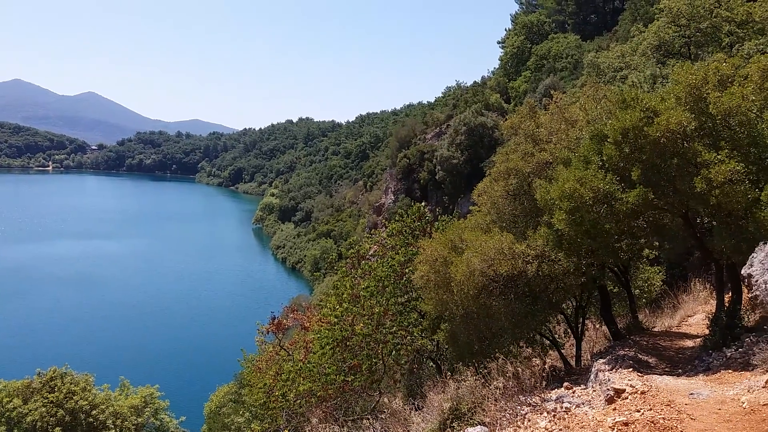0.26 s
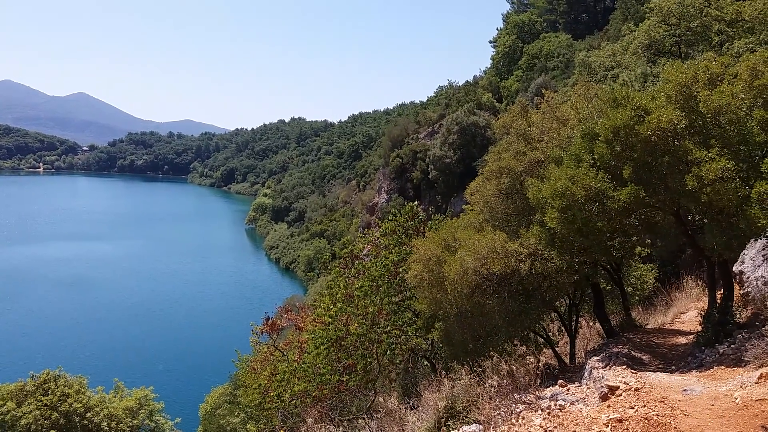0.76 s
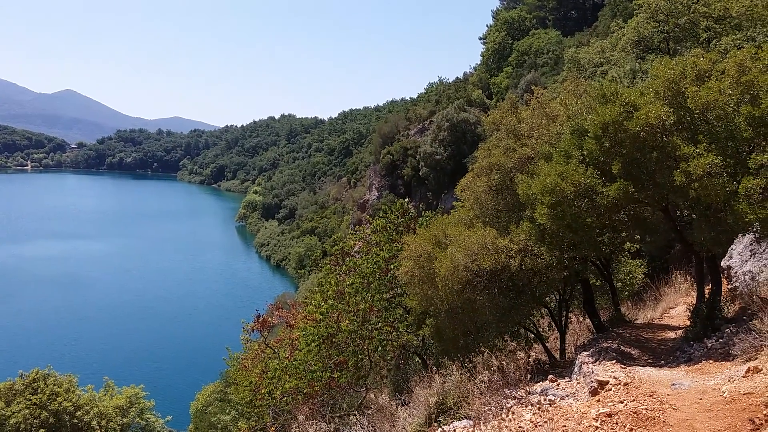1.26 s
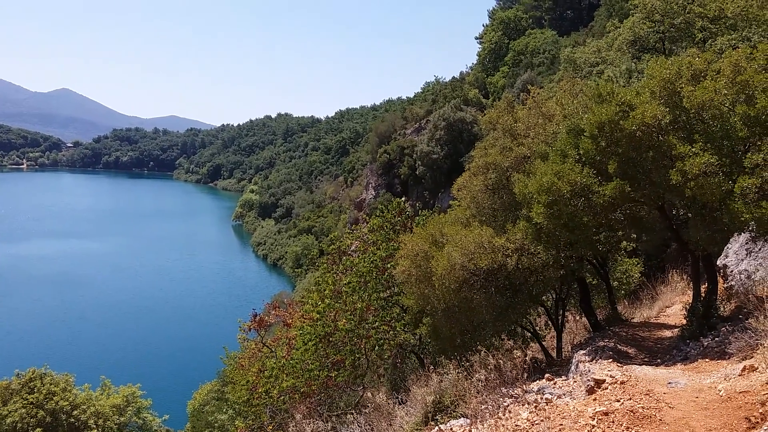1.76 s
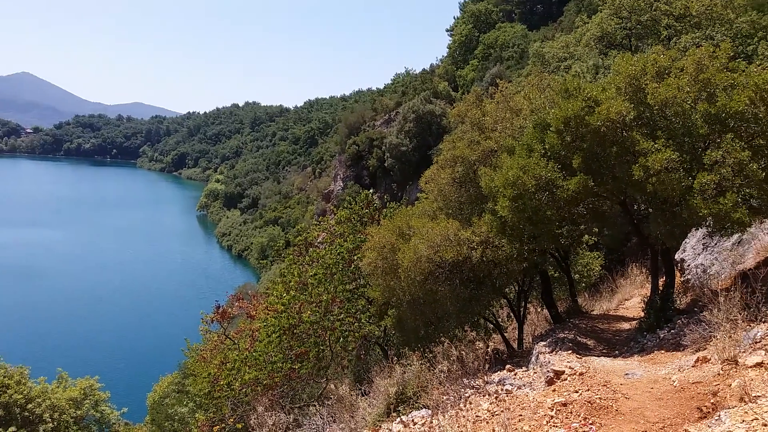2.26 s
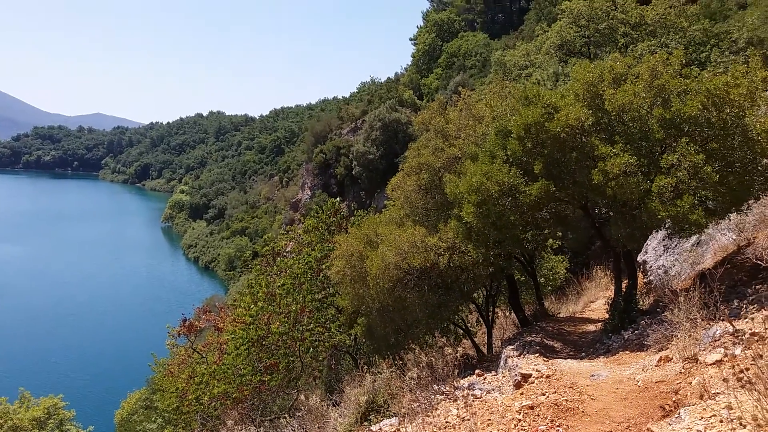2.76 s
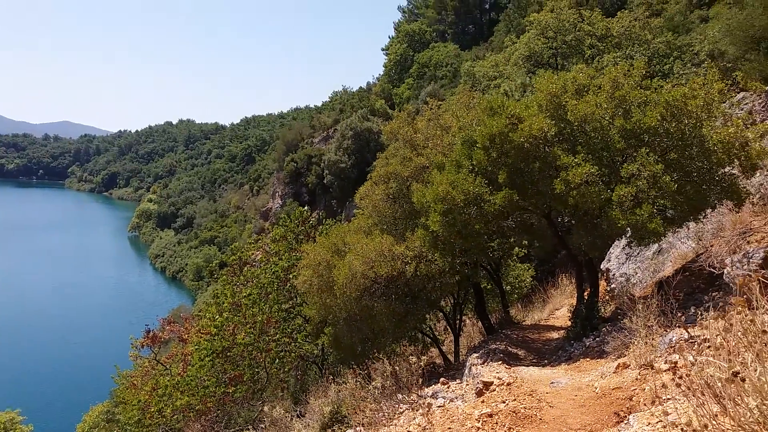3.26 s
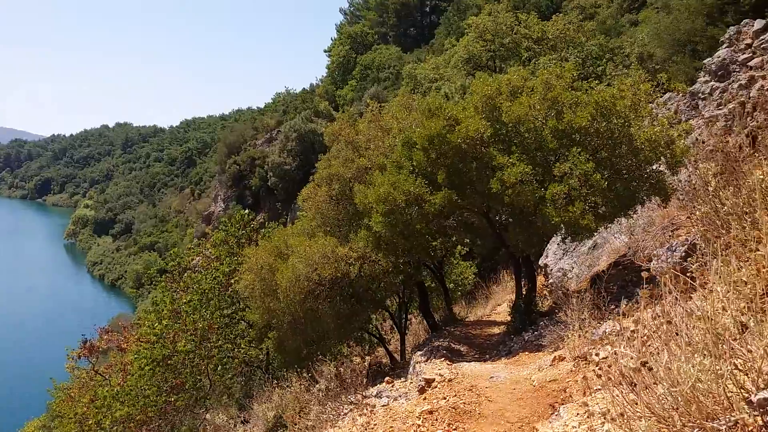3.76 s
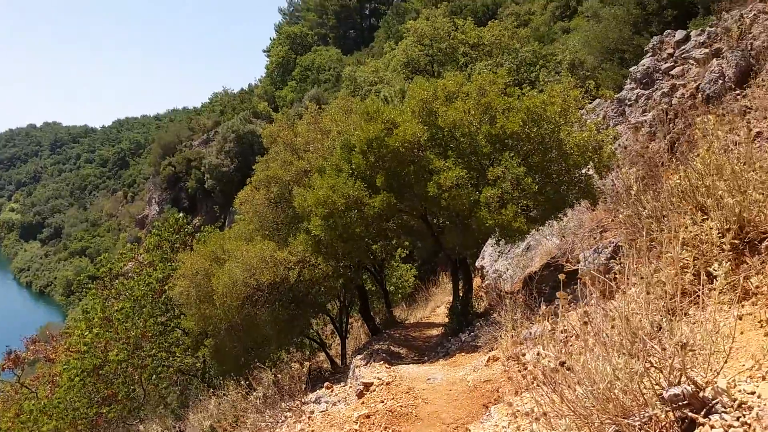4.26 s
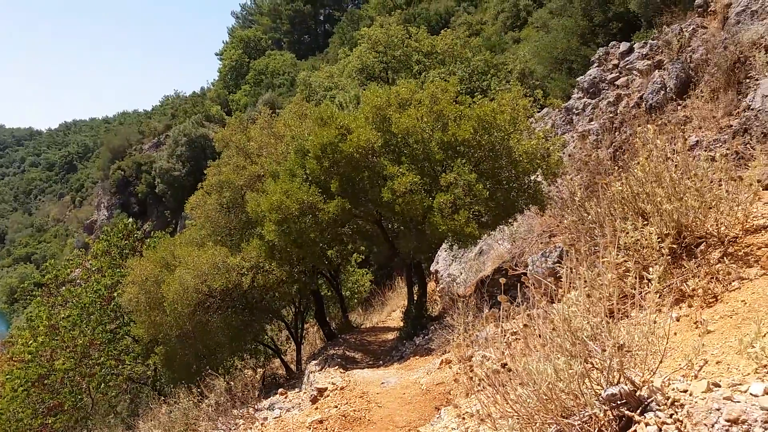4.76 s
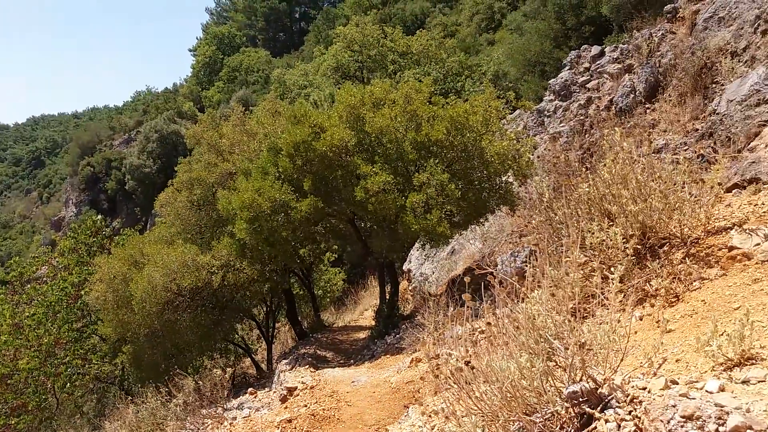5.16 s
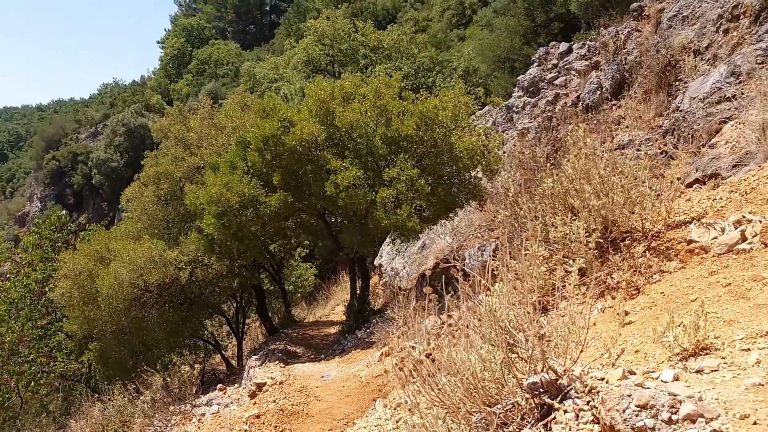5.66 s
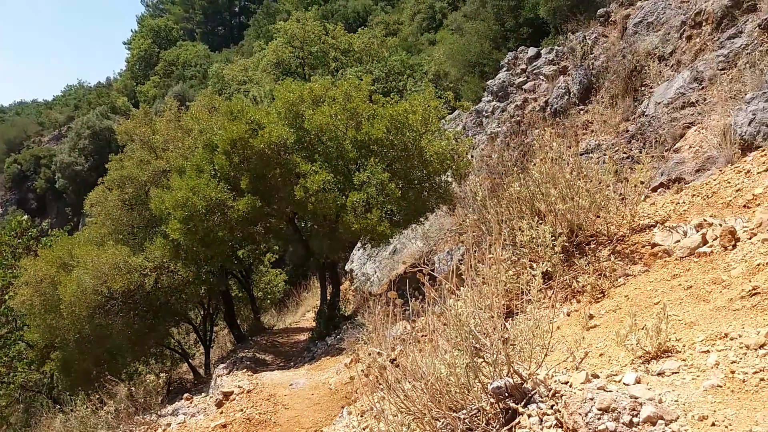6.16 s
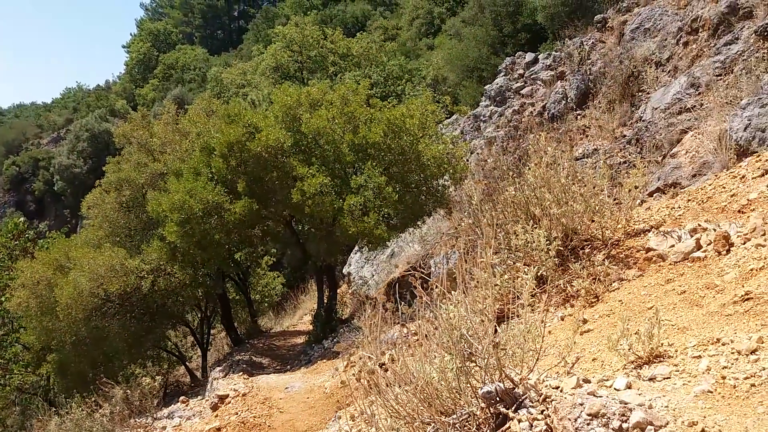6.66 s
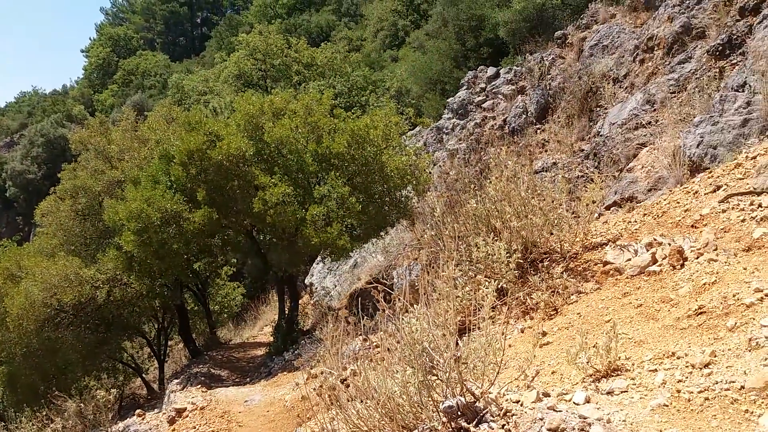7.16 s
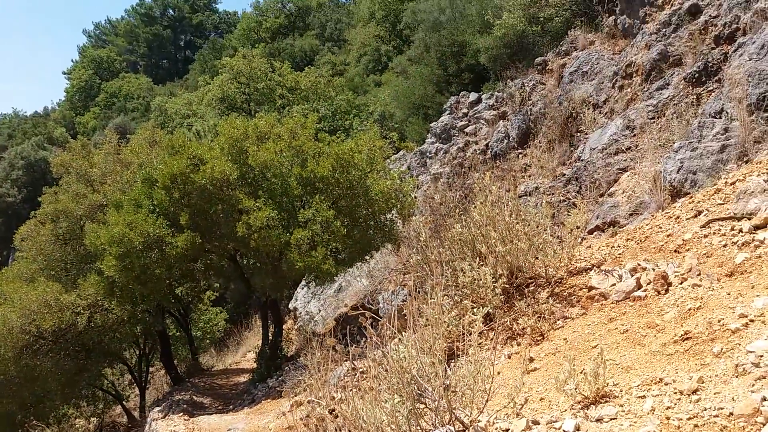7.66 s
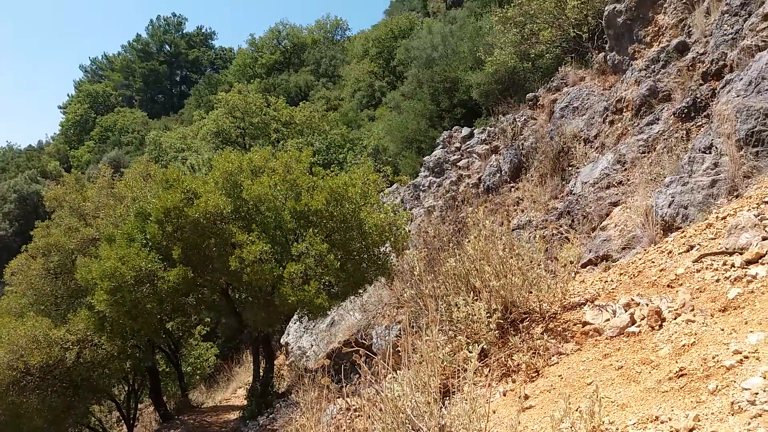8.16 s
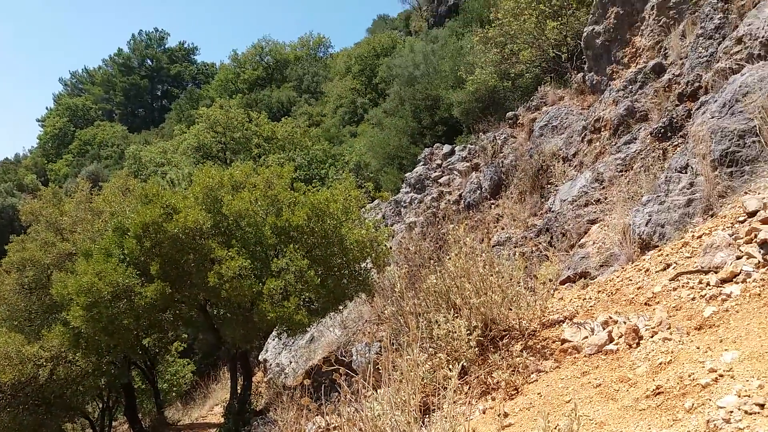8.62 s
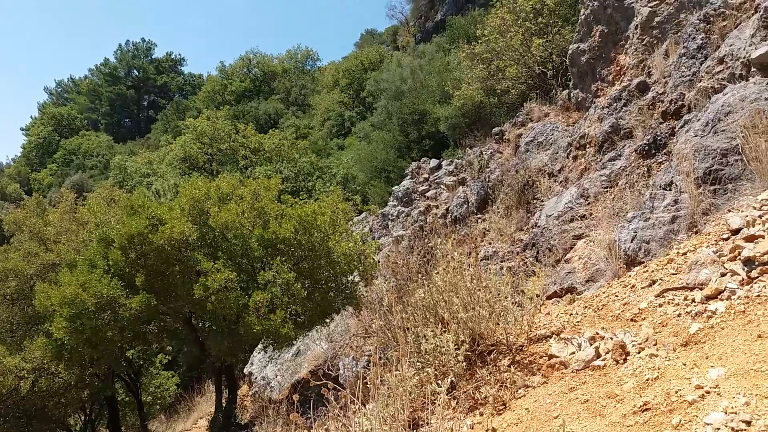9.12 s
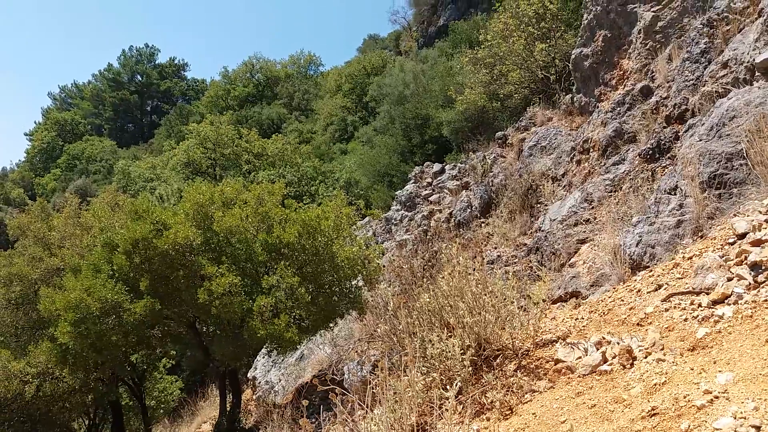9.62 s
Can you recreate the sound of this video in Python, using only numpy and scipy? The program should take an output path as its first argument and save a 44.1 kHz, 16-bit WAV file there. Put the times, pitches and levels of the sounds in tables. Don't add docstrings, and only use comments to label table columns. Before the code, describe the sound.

Cicadas rasp in a steady, high, throbbing chorus outdoors while fingers tick, rub and knock on the hand-held camera in a faint breeze.

```python
import sys
import numpy as np
from scipy import signal
from scipy.fft import rfft, irfft, next_fast_len
from scipy.io import wavfile
from scipy.ndimage import uniform_filter1d

SR = 44100
rng = np.random.default_rng(int(sys.argv[2]) if len(sys.argv) > 2 else 0)


def inscribe(sig):
    pcm = np.round(np.clip(np.atleast_2d(sig).T, -1, 1) * 32767)
    wavfile.write(sys.argv[1], SR, pcm.astype(np.int16))


def nominal_scale(level):
    x = np.asarray(level, float) / 20
    return 10 ** x


N = 436149
TIME_S, FFT_SIZE = np.arange(N) / SR, next_fast_len(N)
BIN_HZ = np.fft.rfftfreq(FFT_SIZE, 1 / SR)


def unit(x):
    return x / np.sqrt(np.mean(x ** 2))


def ring(x, hz, width_hz):
    return signal.lfilter(*signal.iirpeak(hz, hz / width_hz, fs=SR), x)


def butter(x, hz, kind, order=2):
    return signal.sosfilt(signal.butter(order, hz, kind, fs=SR, output="sos"), x)


def walk(rate_hz):
    hold = int(SR / rate_hz)
    steps = np.repeat(rng.standard_normal(N // hold + 1), hold)
    return 1.3 * uniform_filter1d(uniform_filter1d(steps, hold), hold)[:N]


def cicadas():
    # mode_hz, width_hz, level_db
    tymbal_modes = [(4107, 280, -18.5), (4370, 240, -8), (4558, 200, -2.5), (4757, 170, 1),
                    (4943, 220, -7.5), (5186, 220, -5.5), (5440, 220, -11)]
    # mode_hz, width_hz, level_db
    flank_modes = [(5605, 240, 0), (5810, 300, 0.5), (6020, 330, -4.5), (6450, 400, -11.5),
                   (6850, 310, -10.5), (7580, 350, -12.5), (8900, 1700, -18)]
    # time_s, slow_tree_cycles, middle_tree_cycles, quick_tree_cycles
    throb_counts = np.transpose([(0.0, 0.14, -0.03, -0.41), (0.707, 4.7, 5.38, 5.9),
                                 (1.414, 9.69, 10.83, 11.95), (2.121, 14.59, 16.02, 17.8),
                                 (2.829, 19.2, 21.28, 23.57), (3.536, 23.77, 26.52, 29.35),
                                 (4.243, 28.65, 31.93, 34.92), (4.95, 33.29, 37.48, 40.4),
                                 (5.657, 38.09, 42.81, 46.08), (6.364, 42.73, 48.1, 52.02),
                                 (7.071, 47.34, 53.37, 58.04), (7.779, 52.02, 58.77, 64.07),
                                 (8.486, 56.95, 64.2, 70.0), (9.193, 61.93, 69.58, 75.61),
                                 (9.9, 66.75, 75.02, 81.7)])
    # time_s, slow_tree_crest_db, middle_tree_crest_db, quick_tree_crest_db
    tree_crests = np.transpose([(0.0, -53, -53, -59), (0.99, -54, -53.5, -65), (1.98, -56, -54.5, -52),
                                (2.97, -54.5, -56, -51.5), (3.96, -58, -53.5, -64), (4.95, -55, -55, -57),
                                (5.94, -50, -57, -62.5), (6.929, -53, -54, -58.4), (7.92, -59.5, -51, -67),
                                (8.91, -59.5, -62.5, -49), (9.9, -43, -53, -54.5)])
    singers_per_tree = 3
    flank_db, flank_fade_db_s, flank_per_db = (-8, -12.5, -10), -0.5, 0.7
    half_depth_db, squareness, rest_bias = (13.5, 6.5, 9.5), 0.75, -0.19

    chorus = 0
    haze_s = np.arange(6000) / SR
    for tree in range(3):
        cycle = np.cos(2 * np.pi * np.interp(TIME_S, throb_counts[0], throb_counts[tree + 1]))
        throb_db = half_depth_db[tree] * (np.tanh(squareness * (cycle - rest_bias)) - 1)
        bright_db = flank_db[tree] + flank_fade_db_s * TIME_S + flank_per_db * throb_db
        songs = []
        for _ in range(singers_per_tree):
            haze = rng.standard_normal(6000) * np.exp(-haze_s / 0.015) * nominal_scale(-15)
            haze[0] = 1
            songs.append(rfft(singer(), FFT_SIZE) * rfft(haze, FFT_SIZE))
        tint_db = 1.8 * rng.standard_normal((singers_per_tree, len(tymbal_modes)))
        body_spectrum = np.sum(songs * resonances(tymbal_modes, tint_db), axis=0)
        body = unit(irfft(body_spectrum, FFT_SIZE)[:N])
        flank = unit(irfft(sum(songs) * resonances(flank_modes), FFT_SIZE)[:N])
        crest_db = np.interp(TIME_S, tree_crests[0], tree_crests[tree + 1])
        chorus = chorus + nominal_scale(crest_db + throb_db - 0.41) * (body - nominal_scale(bright_db) * flank)
    return chorus


def singer():
    click_hz, jitter, uneven_db, other_side_db = 228, 0.027, 3.5, -3
    pace_hz = click_hz * (1 + 0.03 * rng.standard_normal() + jitter * walk(40))
    beat = np.floor(np.cumsum(pace_hz) / SR + rng.random())
    at = np.flatnonzero(np.diff(beat))
    size = nominal_scale(uneven_db * rng.standard_normal(len(at)) + other_side_db * (beat[at] % 2))
    clicks = np.zeros(N + 200)
    clicks[at] = size
    clicks[at + rng.integers(85, 105, len(at))] = 0.7 * size
    return clicks[:N] * nominal_scale(0.8 * walk(9) + 1.6 * walk(1.5))


def resonances(modes, tint_db=0):
    hz, width_hz, level_db = np.transpose(modes)[:, :, None]
    off = 1j * (BIN_HZ - hz) / width_hz
    swing = (-1) ** np.arange(len(modes))[:, None] * nominal_scale(level_db)
    return nominal_scale(tint_db + np.zeros(len(modes))) @ (swing / (1 + 2 * off) / (1 + off) ** 2)


def knocks():
    # start_s, push_db, rise_ms, hold_ms, fall_ms
    pulling = [(1.2269, -11.6, 0.04, 2.3, 2.36), (1.2284, -20, 0.06, 0.1, 0.5),
               (2.3818, -21.4, 0.15, 0.23, 4.86), (2.427, -9.5, 0.51, 0.0, 2.64),
               (2.4852, -20.8, 0.32, 2.81, 1.65), (5.4953, -28.1, 0.07, 0.01, 0.66),
               (5.5596, 8.9, 0.41, 0.0, 1.49), (5.6914, -3.9, 0.38, 0.0, 3.71),
               (7.4365, 6.6, 0.11, 0.12, 0.8), (7.5968, -14.7, 0.13, 0.0, 5.39),
               (9.6338, -24.3, 0.08, 4.0, 4.61), (9.6396, -12.3, 0.09, 0.78, 2.77),
               (9.8155, -13, 0.4, 0.0, 4.0), (9.8225, -12, 0.3, 0.0, 3.0)]
    # start_s, push_db, rise_ms, hold_ms, fall_ms
    pushing = [
        (1.8869, -27.2, 0.39, 1.57, 3.25),
        (2.3328, -10.6, 0.09, 0.0, 1.03),
        (5.9674, -37.3, 0.29, 2.51, 0.5),
        (7.4729, -15.0, 0.23, 2.59, 4.15),
        (9.5411, -26.1, 0.1, 0.0, 0.18),
    ]

    out = np.zeros(N + 4000)
    ms = np.arange(-250, 3750) * 1000 / SR
    for way, jolts in [(-1, pulling), (1, pushing)]:
        for start_s, push_db, rise_ms, hold_ms, fall_ms in jolts:
            build = (1 + np.tanh(ms / rise_ms / 2)) / 2
            relax = np.exp(-np.logaddexp(0, (ms - hold_ms) / rise_ms) * rise_ms / fall_ms)
            out[round(start_s * SR) - 250:][:4000] += way * nominal_scale(push_db) * build * relax
    return out[:N]


def ticks():
    # start_s, peak_db, ring_hz, thump_re_peak_db
    shell_ticks = [(0.129, -46, 890, 8), (1.144, -48, 1350, 3), (1.179, -41, 2440, -2),
                   (1.351, -52, 1230, -13), (1.804, -49.5, 1260, 4), (1.856, -45, 1140, -3),
                   (1.869, -42.5, 1280, 6), (2.139, -46, 1310, 2), (2.172, -41, 1250, 6),
                   (2.296, -36.5, 1010, 7), (2.405, -36, 1290, -11), (2.825, -44, 966, -5),
                   (2.841, -45.5, 1050, 1), (2.988, -47.5, 1400, -11), (3.042, -48, 1110, -1),
                   (3.579, -48.5, 2180, 8), (3.776, -51.5, 1330, -19), (4.147, -46.5, 930, 5),
                   (4.431, -46, 1460, -6), (4.49, -52, 1330, 3), (6.279, -35.5, 1320, -3.5),
                   (7.833, -36.5, 1390, -1.5), (7.955, -50.5, 1020, 12), (8.132, -42, 1530, -17),
                   (9.092, -38, 1506, -2), (9.227, -50, 1280, 13), (9.552, -57, 937, 2),
                   (9.567, -42.5, 902, 13), (9.579, -51, 902, -15), (9.656, -59, 1060, 0)]
    # start_s, peak_db, ring_hz
    knock_rings = [
        (.188, -48, 3500),
        (1.2268, -29.5, 3470),
        (3.776, -46, 3100),
        (5.5587, -20, 1000),
        (5.5588, -44, 3520),
        (5.691, -29, 1200),
        (7.4306, -42, 900),
        (1.23, -36, 2700),
        (9.541, -42, 3200),
    ]
    # start_s, peak_db, brightest_part_re_peak_db
    snaps = [(1.2262, -43, -41), (1.8687, -32, -14), (2.296, -40, -9), (2.3318, -37, -26), (2.825, -56, -1),
             (2.8405, -49, -1), (5.5586, -24, -18), (5.6875, -50, -30), (7.436, -18, -13.5),
             (9.5793, -32.5, -6), (9.633, -41, -18.5), (9.6403, -31, -21)]

    out = np.zeros(N + 1500)
    t = np.arange(1500) / SR
    for start_s, peak_db, hz, thump_db in [*shell_ticks, *[(*r, -30) for r in knock_rings]]:
        shell = np.sin(2 * np.pi * hz * t) * (hz * t * 7.5) * np.exp(-hz * t * 2.58)
        thump = -nominal_scale(thump_db + 3) * t / 0.0019 * np.exp(1 - t / 0.001)
        out[int(start_s * SR):][:1500] += nominal_scale(peak_db) * (shell + thump)
    for start_s, peak_db, bright_db in snaps:
        noise = rng.standard_normal(1500)
        crack = 0.95 * ring(ring(noise, 4600, 2700), 4600, 2800)
        crack += nominal_scale(bright_db) * ring(ring(noise, 8500, 5000), 9200, 8000)
        burst = t / 0.0005 * np.exp(1 - t / 0.00037)
        out[int((start_s + 0.0002) * SR):][:1500] += nominal_scale(peak_db) * crack * burst
    return out[:N]


def rubs():
    # crest_s, scuff_db, rumble_above_scuff_db,
    # scratch_above_scuff_db, build_up_db_per_s
    drags = [(2.301, -45.5, -1, -11, 2500), (2.316, -41.5, 5.5, -13, 900), (8.3, -71, 15, -9, 298),
             (8.5, -73.5, 16, -16, 300), (9.63, -52, 3, -12, 2000), (9.7, -54, 0, -5, 400),
             (9.725, -52, -8, -3.5, 300), (9.75, -50.5, -14, -6.5, 200), (9.78, -57, -10, 8, 300),
             (9.818, -33, 6, -6, 1100), (9.826, -37.5, 0.5, -12, 1500), (9.85, -49.5, -17, -5, 400),
             (9.87, -50.5, -14, -0.5, 300), (9.889, -48.5, 1, -0.5, 300)]
    # start_s, scuff_db, rumble_above_scuff_db,
    # scratch_above_scuff_db, length_s
    scuffs = [(1.285, -41, 6, -10, 0.014), (1.321, -36, -11, -14.5, 0.025), (1.354, -44, -10, -12, 0.027),
              (1.393, -47.5, 2, -8, 0.029), (1.774, -49.5, -20, -7, 0.021), (1.87, -50, -3, -3, 0.04),
              (1.905, -50.5, -1, -12, 0.047), (1.975, -55.5, -5, -6.5, 0.032), (2.381, -50.5, 9, 4, 0.027),
              (2.45, -32, -12, -24, 0.0084), (2.812, -45, -14, -4.5, 0.015), (3.061, -53, 14, -6, 0.014),
              (4.185, -57.5, 17, -1, 0.01), (5.784, -57, 13, -12, 0.019), (7.47, -37, 8, -8.5, 0.032),
              (7.504, -47.5, 10, -3.5, 0.035), (7.538, -54.5, 15, -2, 0.029), (7.997, -55.5, 17, -8, 0.013),
              (8.967, -57.5, 17, -7.5, 0.017), (9.089, -53.5, 16.5, -10, 0.013),
              (9.157, -54, 17.5, -23.5, 0.012), (9.216, -50.5, -8, -23, 0.029),
              (9.552, -43.5, -1, -10, 0.024), (9.575, -47, 12, -0.5, 0.018),
              (5.512, -46, -12, -6, .01),
        (5.703, -47, -15, -5, .028),
        (7.447, -44, -15, -2, .022),
        (7.588, -40, -6, -12, .005),
    ]
    let_go_db_s = 702

    scuff = butter(ring(slips(1500), 450, 550), 1200, "low")
    rumble = butter(slips(1000), 140, "low", order=4)
    scratch = butter(ring(slips(2500), 1300, 1300), 2700, "low", order=3)
    layers = [unit(scuff), unit(rumble), unit(scratch)]
    gains = np.zeros((3, N))
    for crest_s, scuff_db, rumble_db, scratch_db, build_db_s in drags:
        near = slice(int((crest_s - 0.15) * SR), int((crest_s + 0.1) * SR))
        from_crest_s = TIME_S[near] - crest_s
        shape_db = np.minimum(build_db_s * from_crest_s, -let_go_db_s * from_crest_s)
        gains[:, near] += nominal_scale(scuff_db + shape_db + np.array([[0], [rumble_db + 9.5], [scratch_db]]))
    for start_s, scuff_db, rumble_db, scratch_db, length_s in scuffs:
        count = int(1.5 * max(length_s, 0.004) * SR)
        shape = np.exp(-3 * np.linspace(0, 1.5, count) ** 4)
        layer_db = scuff_db - 7.5 + np.array([[0], [rumble_db + 6.5], [scratch_db]])
        gains[:, int(start_s * SR):][:, :count] += nominal_scale(layer_db) * shape
    return np.sum(uniform_filter1d(gains, size=150) * layers, axis=0)


def slips(rate_hz):
    struck = rng.random(N) < rate_hz / SR
    return struck * rng.standard_normal(N) * nominal_scale(1.8 * rng.exponential(size=N))


def air():
    # time_s, level_db
    gusts = [(0.0, -65), (0.99, -66.5), (1.32, -60.5), (2.18, -62.5), (2.39, -51.5), (2.61, -61.5),
             (3.16, -64.5), (5.4, -65.5), (5.62, -62), (5.92, -66), (7.19, -63.5), (7.44, -60.5),
             (8.56, -68.5), (9.17, -63), (9.28, -64), (9.59, -66), (9.72, -52), (9.89, -54.5)]
    # freq_hz, density_db
    breeze_spectrum = [(15, -47), (25, -27.5), (45, -1.5), (70, -1), (400, -15.5), (900, -24.5),
                       (2000, -29), (2600, -63.5)]
    # freq_hz, density_db
    hiss_spectrum = [(200, -6), (1000, 2), (2500, 3), (3600, 0), (7000, 0), (10000, 0), (15730, -.5),
                     (15780, -55)]
    # time_s, level_db
    hiss_levels = [(0, -77.5), (2.5, -75.5), (3.8, -77), (7.8, -75), (8.25, -78), (8.6, -78.5), (9.6, -75)]
    hiss_per_db, calm_db = 0.24, -66
    sway_db, sway_db_s = -3, 0.62

    gust_db = np.interp(TIME_S, *np.transpose(gusts))
    breeze = butter(coloured(breeze_spectrum), 64, "high")
    deep = butter(breeze, 390, "low")
    breeze = deep * nominal_scale(1.5 * walk(16)) + (breeze - deep) * nominal_scale(1.5 * walk(25))
    breeze = breeze + butter(breeze, 110, "low", order=1) * (nominal_scale(sway_db + sway_db_s * TIME_S) - 1)
    hiss_db = np.interp(TIME_S, *np.transpose(hiss_levels)) + 5.5 + hiss_per_db * (gust_db - calm_db)
    return breeze * nominal_scale(gust_db + 3) + coloured(hiss_spectrum) * nominal_scale(hiss_db)


def coloured(points):
    hz, density_db = np.transpose(points)
    gain = nominal_scale(np.interp(np.log(BIN_HZ + 1), np.log(hz), density_db))
    return unit(irfft(rfft(rng.standard_normal(FFT_SIZE)) * gain, FFT_SIZE)[:N])


def buzzers():
    # start_s, length_s, ring_hz, level_db
    far_insects = [
        (.25, .6, 7500, -83),
        (1.75, 1.5, 7650, -83),
        (1.9, 1.2, 6900, -82),
        (3.6, 1.2, 7560, -85),
        (4.9, 1.6, 6850, -85),
        (6.9, .9, 6900, -88.5),
    ]
    fade_s, width_hz = 0.13, 300
    clicks = slips(4000) * nominal_scale(3 * walk(9))
    out = 0
    for start_s, length_s, hz, level_db in far_insects:
        inside_s = np.minimum(TIME_S - start_s, start_s + length_s - TIME_S)
        fade = np.clip(inside_s / fade_s, 0, 1)
        out = out + nominal_scale(level_db) * fade * unit(ring(ring(clicks, hz, width_hz), hz, width_hz))
    return out


def scene():
    handling = butter(knocks() + ticks() + rubs(), 55, "high", order=6)
    handling = butter(handling, 120, "high")
    return (cicadas() + handling + air() + buzzers())[None]


def band_limit(x):
    return signal.sosfilt(signal.butter(12, 16950, fs=SR, output="sos"), x)


def record(dry):
    return band_limit(dry)


dry = scene()
out = record(dry)
inscribe(out)
```